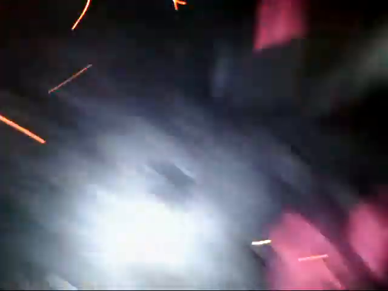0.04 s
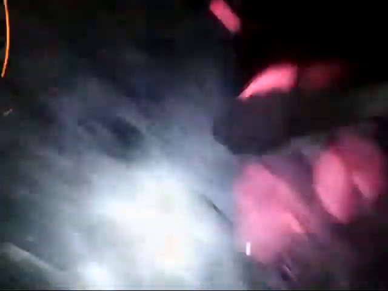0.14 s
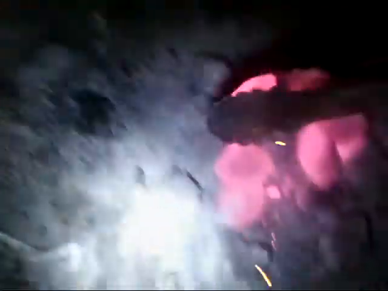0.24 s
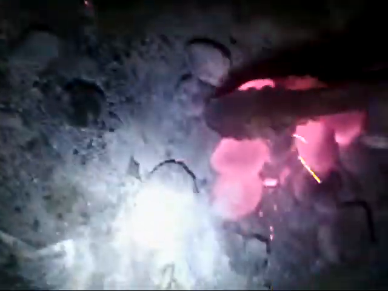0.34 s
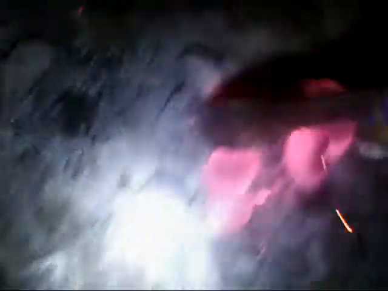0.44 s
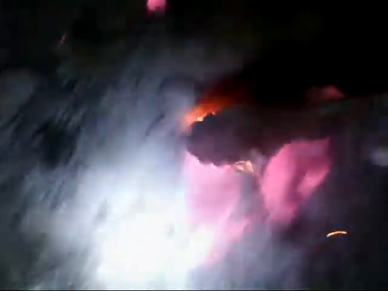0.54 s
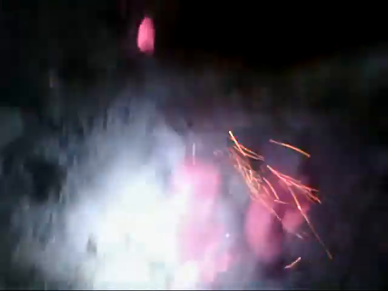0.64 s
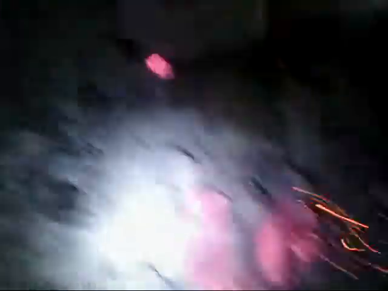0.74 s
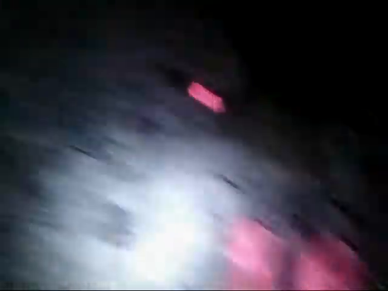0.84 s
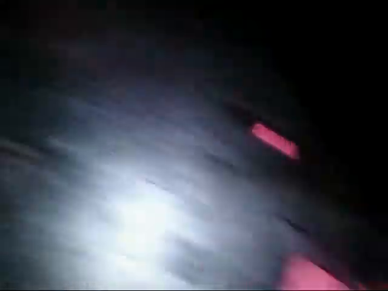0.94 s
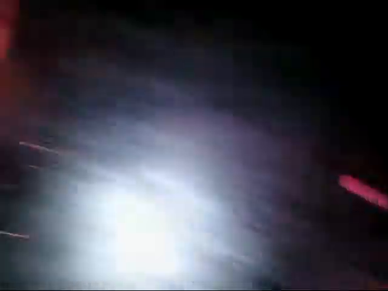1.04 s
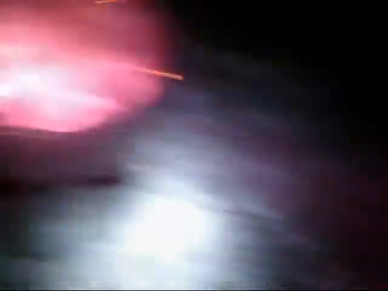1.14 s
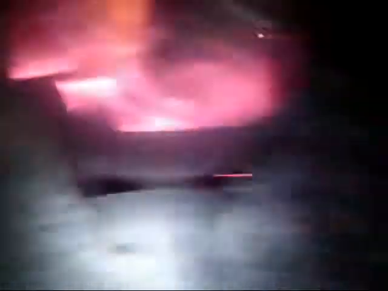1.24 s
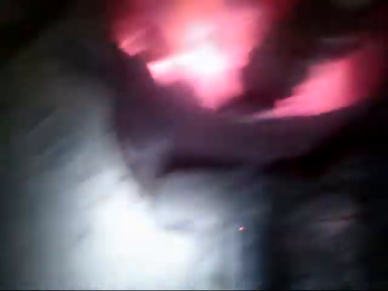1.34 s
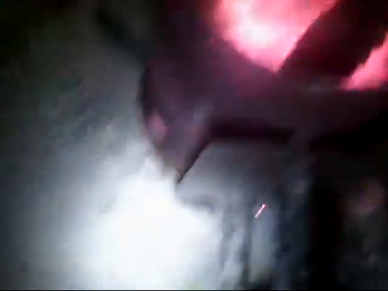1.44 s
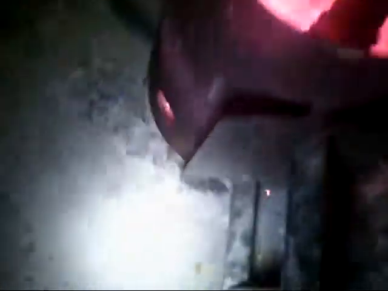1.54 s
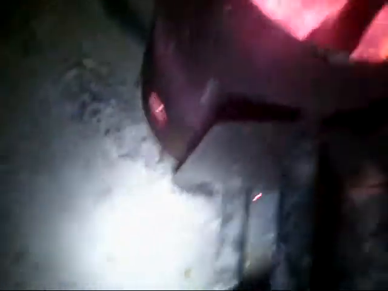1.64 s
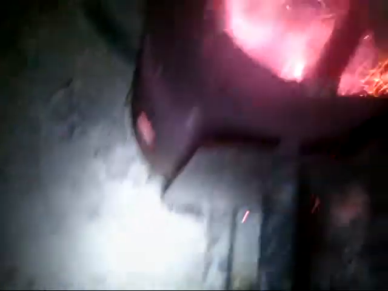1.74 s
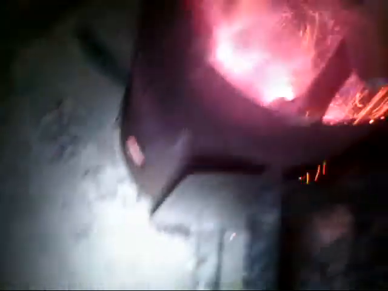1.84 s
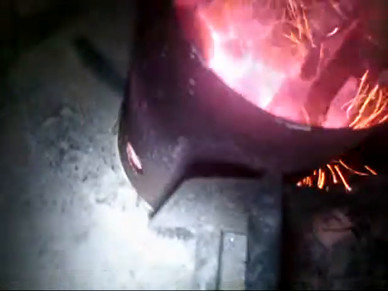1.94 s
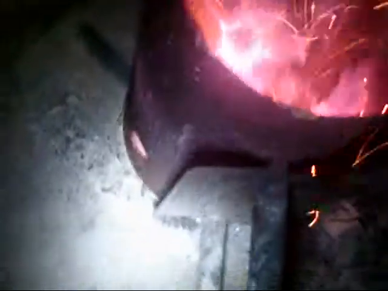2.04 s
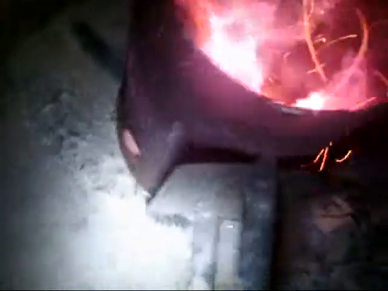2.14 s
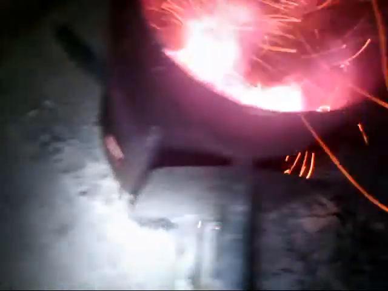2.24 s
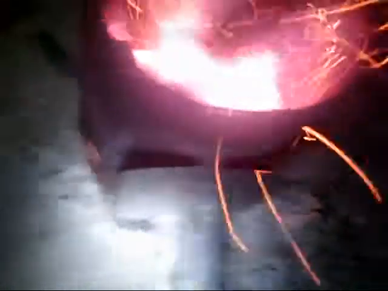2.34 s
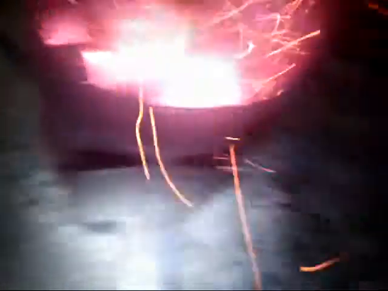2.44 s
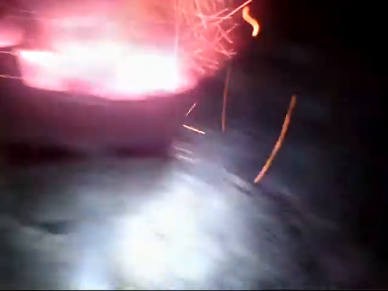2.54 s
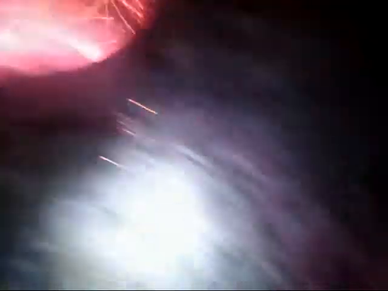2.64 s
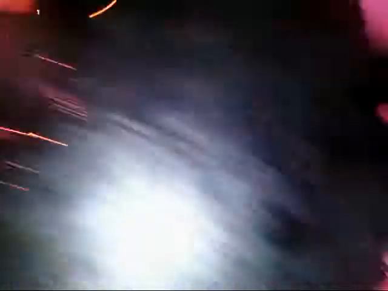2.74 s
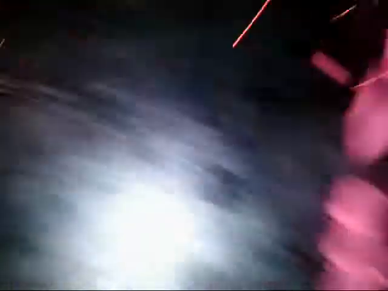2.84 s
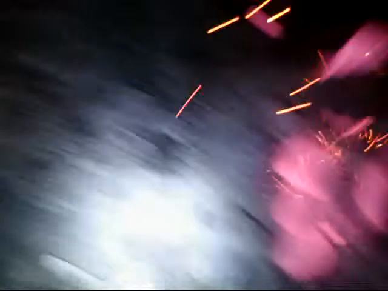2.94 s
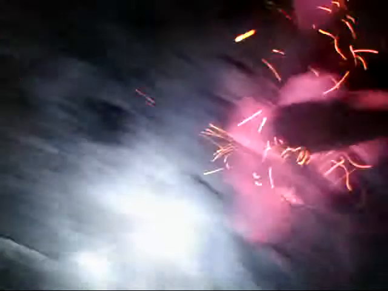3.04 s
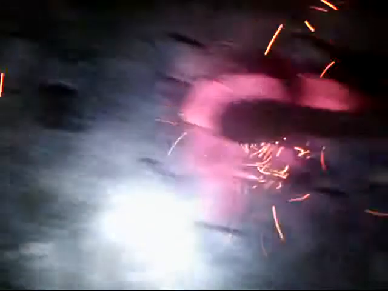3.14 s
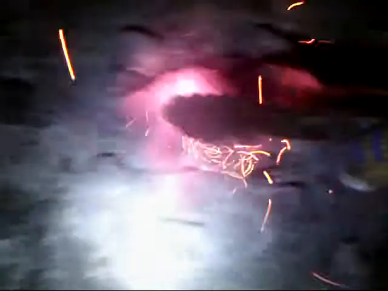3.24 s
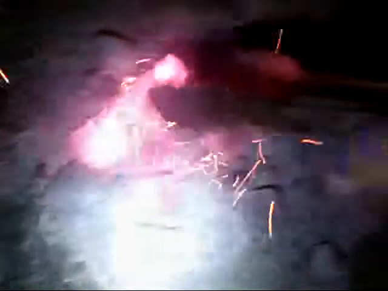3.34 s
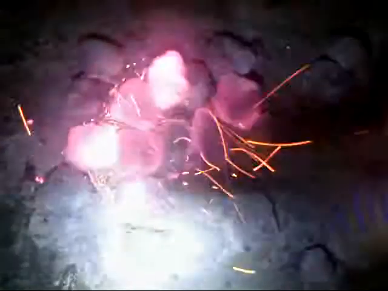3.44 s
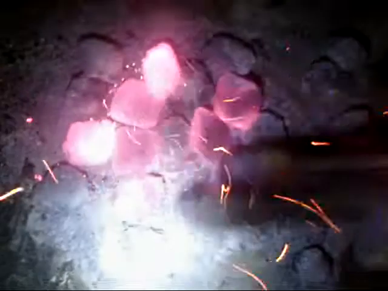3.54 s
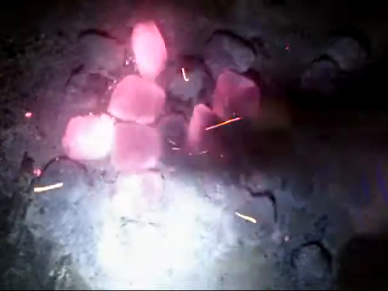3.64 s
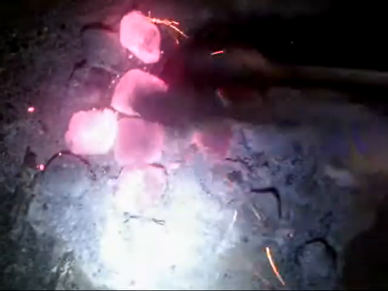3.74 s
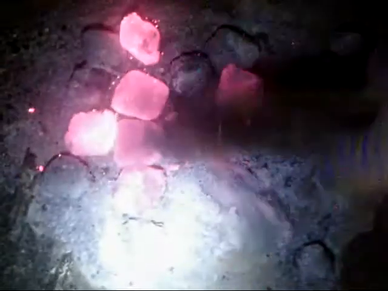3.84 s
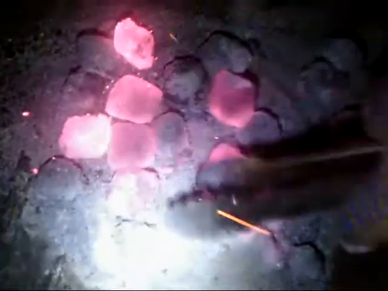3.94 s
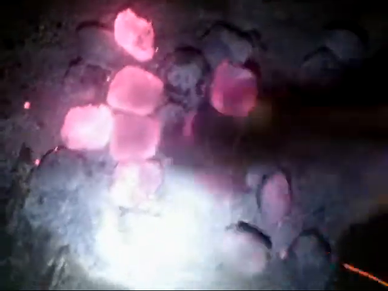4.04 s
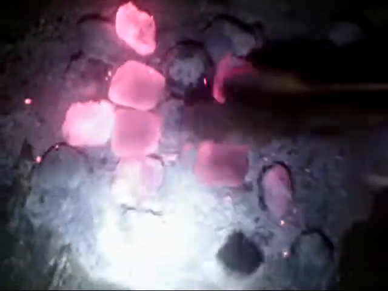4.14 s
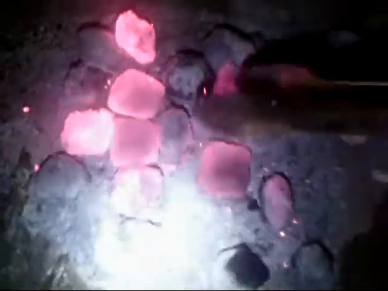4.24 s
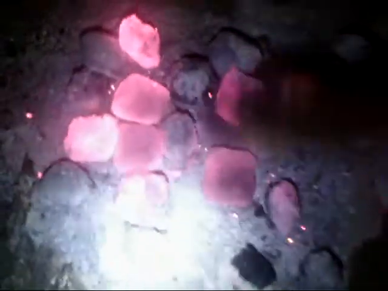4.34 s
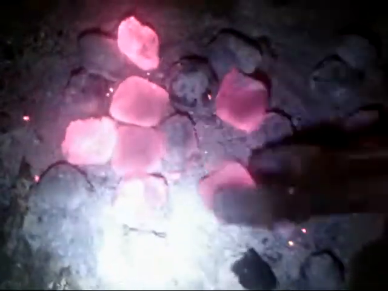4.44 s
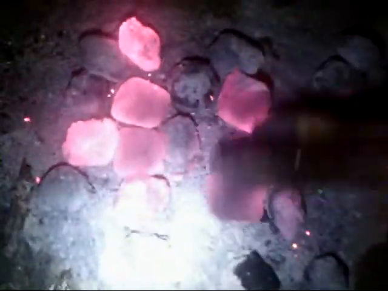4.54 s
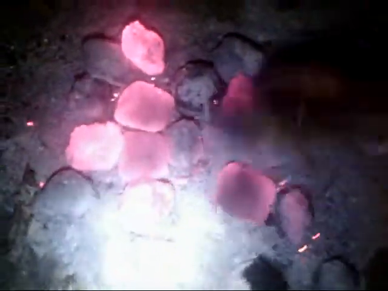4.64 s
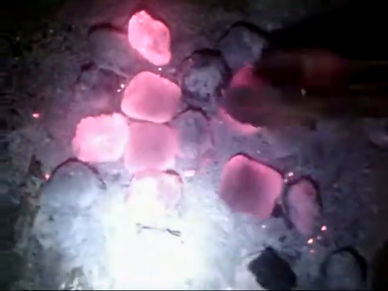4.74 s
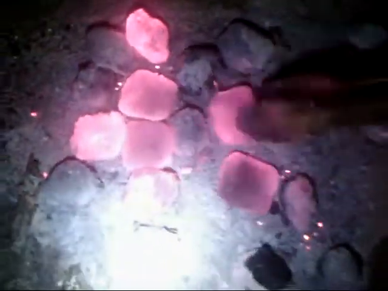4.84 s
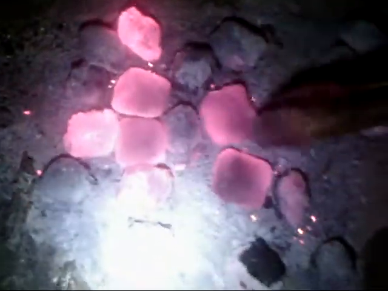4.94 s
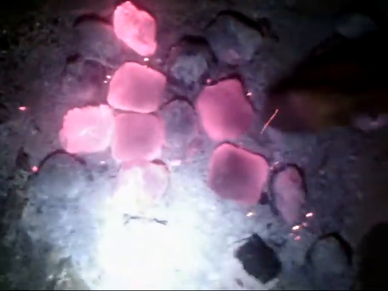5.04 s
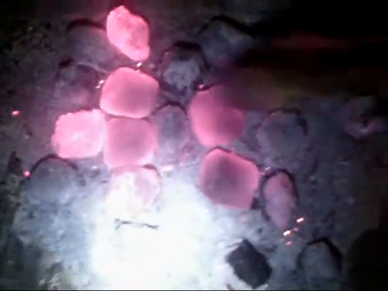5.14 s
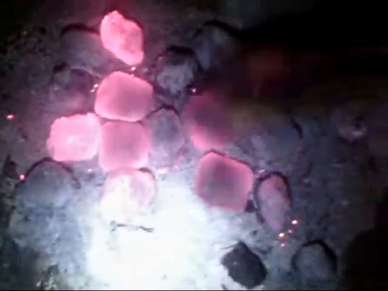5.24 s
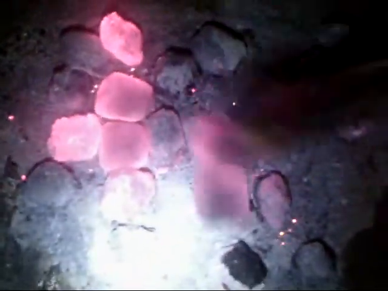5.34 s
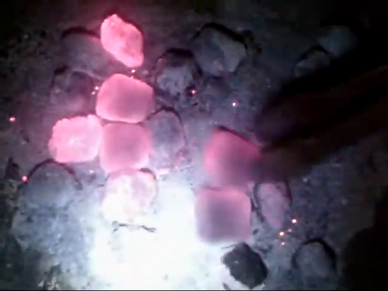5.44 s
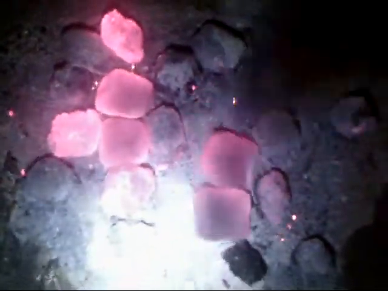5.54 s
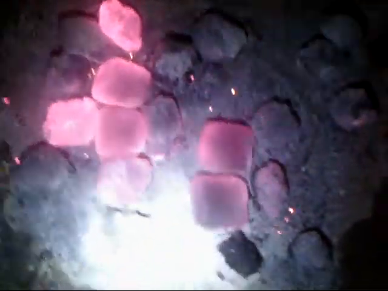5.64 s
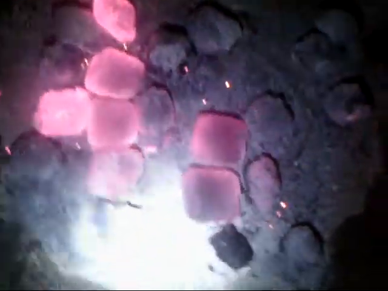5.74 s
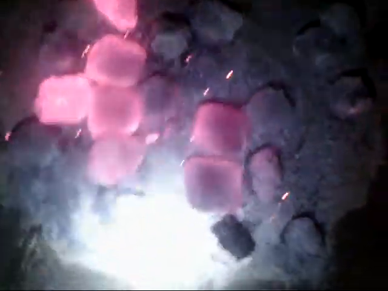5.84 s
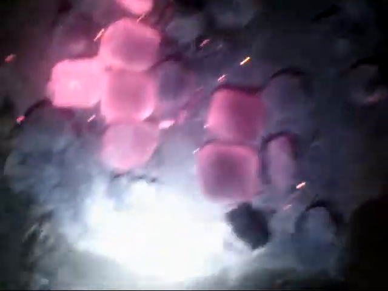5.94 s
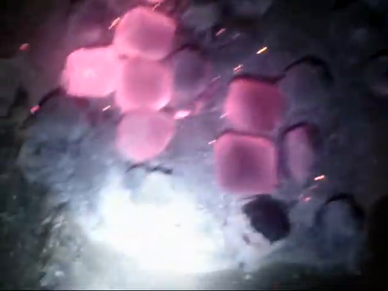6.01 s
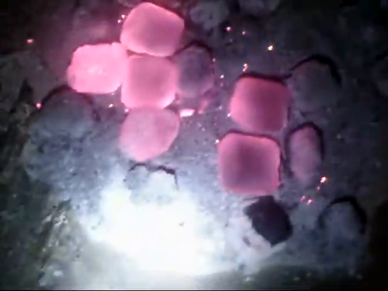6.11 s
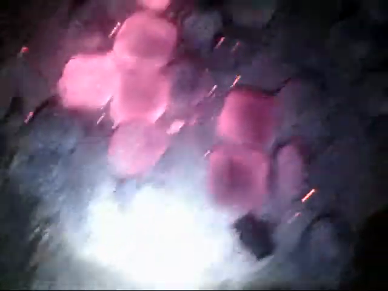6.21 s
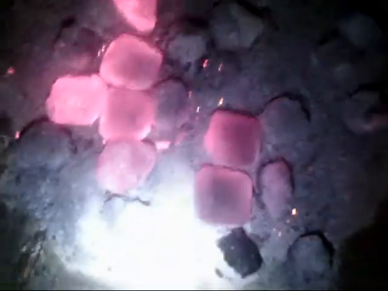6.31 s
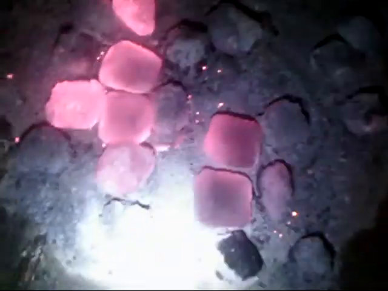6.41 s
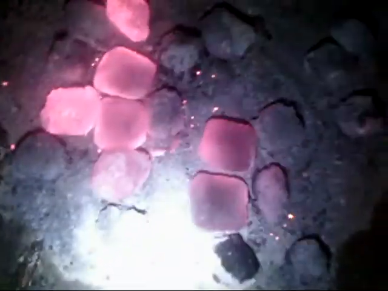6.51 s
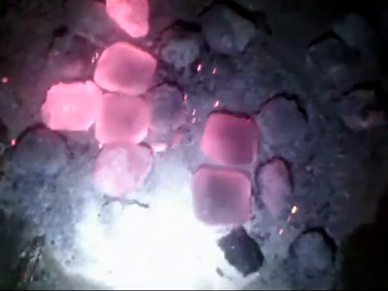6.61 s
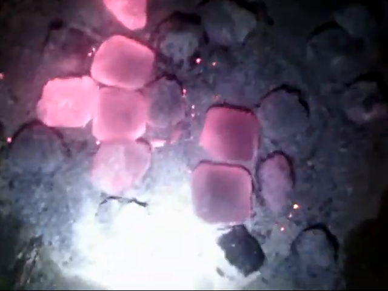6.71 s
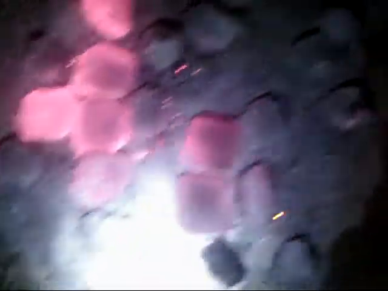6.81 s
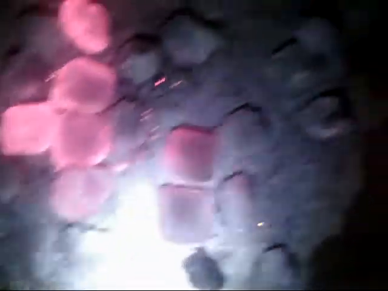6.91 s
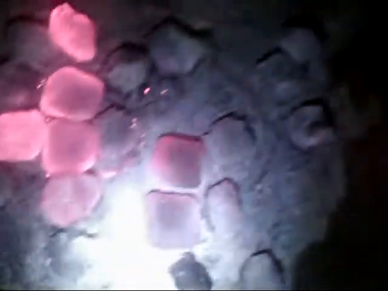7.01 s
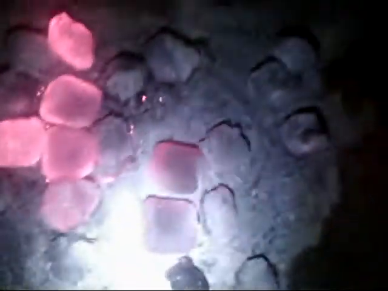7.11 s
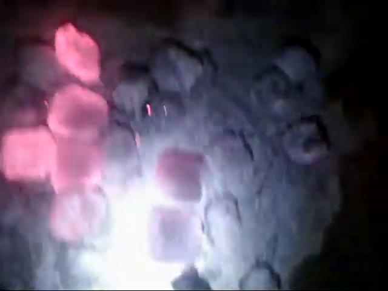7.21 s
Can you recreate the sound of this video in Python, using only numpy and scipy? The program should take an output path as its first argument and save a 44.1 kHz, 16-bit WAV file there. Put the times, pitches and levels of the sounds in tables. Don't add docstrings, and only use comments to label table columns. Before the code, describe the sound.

Brittle charcoal briquettes knock, crunch and scrape over ashy ground, tongs ticking faintly, with low wind buffets and a faint pulsing electronic whistle behind.

```python
import sys
import numpy as np
from scipy import signal
from scipy.fft import rfft, irfft, next_fast_len
from scipy.io import wavfile
from scipy.ndimage import uniform_filter1d

SR = 44100
rng = np.random.default_rng(int(sys.argv[2]) if len(sys.argv) > 2 else 0)


def nominal_scale(level):
    x = np.asarray(level, float) / 20
    return 10 ** x


def bounce(signal):
    frames = np.transpose(np.atleast_2d(signal))
    limited = np.clip(frames, -1, 1)
    pcm = np.round(limited * 32767).astype(np.int16)
    wavfile.write(sys.argv[1], SR, pcm)


N = 320594

# pitch_hz, level_db, t60_s
GROUND_MODES = [(79, -11.5, 0.08), (125.8, -5, 0.14), (190.5, -8.5, 0.096), (209.7, -2.5, 0.064),
                (273, -11, 0.05), (331, -9.5, 0.056)]
BRIQUETTE_MODES = [(381, -7.5, 0.089), (516, 4, 0.022), (604, -0.5, 0.07), (669, 0, 0.044),
                   (780.5, -1.5, 0.041), (834, -19.5, 0.038), (905, -0.5, 0.017), (1054, -7, 0.12),
                   (1210, -17, 0.12)]
TONGS_MODES = [(1427, 2.5, 0.038), (1666, 4.5, 0.013), (2125, 6.5, 0.011), (2490, 6.5, 0.018),
               (2980, -15, 0.01), (3520, -13.5, 0.024), (4320, -7, 0.015)]
PORT_MODES = [(7130, 9, 0.002), (8250, 9.5, 0.0023), (10200, -3, 0.0027), (11700, -20, 0.0014),
              (13450, -3, 0.0028)]

# start_s, knock_peak_db, thud_re_knock_db, tongs_re_knock_db
CRACKS = [(0.081, -51, -7, -3), (0.509, -43.5, -2, -3), (0.651, -23.5, -7, -21), (0.666, -37, 2, -18),
          (1.51, -47, 19, -10), (1.639, -35, 7, -12), (1.692, -22.5, -19, -38), (1.714, -35, -9, -18),
          (1.809, -42, -5, -17), (1.858, -34, -2, -24), (2.065, -43, -10, -2), (3.009, -8, -1, -26.5),
          (3.202, -31.5, 3, -16), (3.279, -34.5, 5, -16), (3.315, -38.5, -8, -3), (3.36, -22, 5, -33),
          (3.529, -32, -20, -13), (3.545, -41, 19.5, -2), (3.603, -22.5, -9, -7.5), (3.623, -57, 5, -4),
          (3.947, -19, -9.5, -19.5), (4.018, -52, -4, -3), (4.885, -35, 7, -5), (4.989, -45.5, -12, -2),
          (5.022, -31.5, -26, -20), (5.383, -41, 22, -8), (6.868, -21, -3, -16.5), (6.886, -35, 3, -6),
          (6.913, -29, -5, -15)]
# start_s, knock_peak_db, thud_re_knock_db, tongs_re_knock_db
PINCHES = [(0.591, -37, 6, -17), (1.966, -46, 4, -21), (2.077, -27.5, -9, 0.5), (2.215, -42, -8, -9),
           (2.647, -36, -15, -2.5), (2.871, -40, -4, -11), (3.034, -19, 2, -21), (4.843, -36, -4, -9),
           (5.408, -39, -8, -1), (5.436, -35, -8, -9), (5.467, -25, -5, -12), (6.058, -39, 5, -10),
           (6.087, -47, -14, -6), (6.139, -51, -15, -6), (6.173, -39, 5, -4), (6.892, -29, -7, -8)]
# start_s, knock_peak_db, thud_re_knock_db, tongs_re_knock_db
SETTLES = [
    (0.526, -30, 5.5, -22),
    (0.535, -38, -3, -5),
    (1.484, -22.5, -13, -26),
    (1.586, -32.5, -5, -16),
    (3.437, -41, 8, -16),
    (4.424, -34.5, -2, -10.5),
    (4.52, -27, -5, -12),
    (6.975, -40, 6, -9),
    (7.034, -33.5, 8.5, -14),
]
# start_s, length_s, knock_db, thud_re_knock_db, tongs_re_knock_db
SCRAPES = [(1.482, 0.057, -44, 6.5, 4.5), (1.59, 0.074, -38.5, 0.5, -2.5), (1.679, 0.057, -33, -3, -7),
           (1.774, 0.085, -36, -1, -6), (1.89, 0.17, -44, 4.5, -7), (2.045, 0.082, -45, 8.5, -3),
           (3.116, 0.175, -47, 15.5, -4), (3.402, 0.21, -52, 13.5, -3), (3.665, 0.1, -57.5, 17, 4),
           (4.852, 0.08, -33.5, 4, -7.5), (5.384, 0.1, -31, 6, -8.5), (6.033, .06, -44, 4, -5),
           (6.1, 0.037, -47, -2, -0.5), (7.1, .15, -48, -4, -3), (6.87, 0.035, -37.5, 8, -5.5)]
# start_s, fall_20_db_s, knock_db, thud_re_knock_db, tongs_re_knock_db
ROLLS = [
    (3.027, 0.1, -27.5, 0, -17),
    (3.358, 0.1, -37, -8, -22),
    (3.625, .07, -42, 8, -20),
    (3.95, 0.2049, -34, 0, -5),
    (4.428, .06, -37, 3, -23),
    (4.534, .12, -44.5, 9, -4),
]

# start_s, peak_db, knock_hz, thud_hz, thud_re_knock_db
KNOCKS = [(0.528, -31, 550, 140, -16), (0.65, -26, 536, 131, -3.5), (0.667, -33.5, 584, 218, 4),
          (1.486, -34, 525, 136, -26), (1.697, -24.5, 755, 322, -5.5), (1.714, -30.5, 760, 256, 1.5),
          (1.972, -41.5, 800, 192, 10.5), (3.011, -13, 924, 125, -8.5), (3.027, -20, 954, 216, -0.5),
          (3.038, -35, 680, 126, -24), (3.362, -20.5, 767, 123, -14), (3.379, -34.5, 756, 234, 3.5),
          (3.438, -39.5, 571, 200, 7), (3.605, -31.5, 686, 111, -2), (3.949, -35.5, 620, 307, 1),
          (4.434, -28.5, 587, 296, -5), (4.524, -34.5, 498, 111, 1), (4.889, -24, 683, 184, -10.5),
          (5.387, -32, 673, 124, -3), (6.892, -31.5, 580, 276, 2)]
# start_s, peak_db, pitch_hz
TICKS = [(0.5, -42, 1700), (0.5153, -44, 2480), (0.5357, -42, 1500), (2.0784, -45, 1660),
         (2.6497, -35, 1790), (3.0158, -33.5, 2420), (6.0575, -44, 2490), (6.095, -46, 1600),
         (6.112, -38, 1630), (6.1386, -46, 2580), (6.1774, -47, 1630), (6.871, -29.5, 2490),
         (3.972, -36, 2610)]
# start_s, peak_db, pitch_hz
CLINKS = [(0.5352, -38, 4250), (1.5144, -41, 4270), (2.0787, -37, 4250), (3.0121, -48, 3720),
          (6.0566, -41, 4230), (6.0896, -43, 4270), (6.1394, -33.5, 4250), (6.871, -37, 5520),
          (6.871, -35, 4340), (3.013, -38, 6050), (6.8874, -39, 4330)]

# middle_s, half_length_s, level_db
SIFTS = [
    (0.54, 0.01, -52),
    (1.535, .025, -49),
    (1.6, 0.014, -51),
    (1.652, .012, -49),
    (1.825, .03, -56),
    (2.083, 0.012, -45),
    (3.203, .008, -53),
    (4.923, 0.023, -49),
    (5.48, 0.023, -53),
    (6.12, 0.052, -55),
]
# pitch_hz, level_db, t60_s
SIFT_RINGS = [(8500, -3.5, .006), (13650, -7, .005)]

# time_s, level_db
GUST = [(0.0, -31.5), (0.34, -42), (0.85, -40), (1.07, -29), (1.54, -41.5), (2.33, -43), (2.55, -37.5),
        (2.71, -45), (3.16, -41.5), (3.99, -43), (4.29, -42), (4.49, -61), (4.59, -49.5), (5.3, -38),
        (5.55, -50), (6.3, -46), (6.62, -42), (7.27, -57)]
# middle_s, level_db
PUFFS = [
    (0.028, -26),
    (0.11, -31),
    (1.039, -23),
    (1.17, -44),
]
# frequency_hz, density_db_per_hz
WIND_SPECTRUM = [(8, 12), (17, 5.5), (24, -9), (33, -3), (45, -10), (62, 1.5), (80, -17), (100, -12),
                 (140, -76.5)]
SWAY_SPECTRUM = [(1, -14.5), (10, 4), (18, -29), (26, -21), (36, -8.5), (48, -29), (70, -60)]
NIGHT_SPECTRUM = [(53, -25), (90, -3), (172, -10.5), (500, -16), (1000, -17), (3220, -26), (8500, -29),
                  (16000, -37)]
# pitch_hz, width_hz, level_db
DRONES = [(1171, 15, -64.5)]
# multiple_of_firing_rate, level_db
ENGINE_ORDERS = [(1, -50), (2, -54), (3, -58), (4, -54.5), (5, -55.5), (7, -68), (8, -68)]
# pitch_hz, level_db
WHINES = [(5599, -76), (7014, -79), (7402, -79), (8086, -81), (9598, -82), (12452, -85), (14648, -89),
          (15036, -90)]

# grit_re_tongs_db, crumble_t60_s
CRACK, PINCH, SETTLE = (1.5, 0.058), (-8.5, 0.085), (-5.5, 0.16)
SETTLE_S = 0.003
SWELL_DB, STOP_S = 6.0, 0.062
THUD_LINGER = 1.5
DRAG_GRIT_DB, GRIP_S = -12.5, 0.0067
KNOCK_T60_S, TICK_T60_S, CLINK_T60_S = 0.056, 0.05, 0.019
PUFF_S, PUFF_HZ = 0.031, 6.2
SWAY_DB, NIGHT_DB = -38, -49
ENGINE_HZ, ENGINE_WAVER_HZ = 33.3, 0.12
WHISTLE_HZ, WHISTLE_DB = 2579.5, -58.5
PULSES_PER_S, PULSE_START, DUTY = 19.886, -0.13, 0.63
CUTOFF_HZ, OFFSET = 15650, -0.016


def contacts():
    bumps = drift(42)
    thud = body(GROUND_MODES, pressure(bumps, layer=0, blow_db=-11.0), (80, 350),
                per_s=460, spread_db=0.1, uneven_db=5.0, touch=14.4, dry_db=-8)
    knock = body(BRIQUETTE_MODES, pressure(bumps, layer=1, blow_db=-14.5), (300, 1400),
                 per_s=820, spread_db=2.5, uneven_db=0.94, touch=15.0, dry_db=-5.5)
    tongs = body(TONGS_MODES, pressure(bumps, layer=2, blow_db=-7), (1100, 5000),
                 per_s=1500, spread_db=-1.5, uneven_db=1.5, touch=11.0, dry_db=-7.0)
    grit = body(PORT_MODES, pressure(bumps, layer=3, blow_db=-6), (4500, 15500),
                per_s=8000, spread_db=7.0, uneven_db=1.0, touch=1.5, dry_db=-2)
    soft_thud = signal.sosfilt(signal.butter(2, 420, fs=SR, output="sos"), thud)
    soft_knock = signal.sosfilt(signal.butter(4, 1350, fs=SR, output="sos"), knock)
    return soft_thud + soft_knock + tongs + grit


def body(modes, push, band_hz, per_s, spread_db, uneven_db, touch, dry_db):
    force = grains(per_s, spread_db)
    force[[round((row[0] + SETTLE_S) * SR) for row in touches()]] = touch
    rung = np.zeros(N)
    steady_power = 0
    for k, (hz, db, t60) in enumerate(modes):
        steady_power += nominal_scale(2 * db) * t60 * SR / np.log(1e12)
        strike = force * push * nominal_scale(uneven_db * drift(8.6))
        rung += nominal_scale(db) * (-1) ** k * ring(strike, hz, t60)
    band = signal.butter(2, band_hz, "band", fs=SR, output="sos")
    direct = signal.sosfilt(band, force * push + 1e-18)
    direct /= np.sqrt(2 * (band_hz[1] - band_hz[0]) / SR)
    return rung / np.sqrt(steady_power) + nominal_scale(dry_db) * direct


def pressure(bumps, layer, blow_db):
    push = np.zeros(N)
    for s, knock_db, *rel_db, t60 in touches():
        at, t60 = round(s * SR), max(t60, 0.005)
        after = np.arange(min(round(t60 * SR), N - at)) / SR
        level_db = knock_db + (rel_db[0], 0, rel_db[1], rel_db[2])[layer] + blow_db
        build_up = np.minimum(after / SETTLE_S, 1)
        push[at:at + len(after)] += nominal_scale(level_db + 2 - 60 * after / t60) * build_up

    stop = 2 * STOP_S * (THUD_LINGER if layer == 0 else 1)
    drags = [(row, [0, row[1], row[1] + stop], [-SWELL_DB, 0, -40]) for row in SCRAPES]
    drags += [(row, [0, 2 * row[1]], [0, -40]) for row in ROLLS]
    for (s, _, knock_db, thud_db, tongs_db), times, shape_db in drags:
        at = round(s * SR)
        t = np.arange(min(round(times[-1] * SR), N - at)) / SR
        span = slice(at, at + len(t))
        level_db = knock_db + (thud_db, 0, tongs_db, tongs_db + DRAG_GRIT_DB)[layer]
        level_db = level_db + np.interp(t, times, shape_db)
        push[span] += nominal_scale(level_db - 6.0 + 2.2 * bumps[span]) * np.minimum(t / GRIP_S, 1)
    return push


def touches():
    kinds = (CRACKS, CRACK), (PINCHES, PINCH), (SETTLES, SETTLE)
    return [(*row, row[-1] + grit_db, t60) for rows, (grit_db, t60) in kinds for row in rows]


def grains(per_s, spread_db):
    size = nominal_scale(spread_db * np.minimum(rng.exponential(1, N), 4)) * rng.choice([-1, 1], N)
    return rms_one(size * (rng.random(N) < per_s / SR))


def knocks():
    out = np.zeros(N)
    for rows, t60 in (TICKS, TICK_T60_S), (CLINKS, CLINK_T60_S):
        for s, db, hz in rows:
            add_mode(out, s, db - 1.0, hz, t60, rise=0.0004)
    for s, db, hz, thud_hz, thud_db in KNOCKS:
        add_mode(out, s, db - 2.0, hz, KNOCK_T60_S, rise=0.00078)
        add_mode(out, s, db - 19.5, 1.1 * hz, KNOCK_T60_S, rise=0.00087)
        add_mode(out, s, db + thud_db + 3.5, thud_hz, 1.73 * KNOCK_T60_S, rise=0.0004)
    return out


def add_mode(out, s, db, hz, t60, rise):
    at = round(s * SR)
    t = np.arange(min(round(max(t60, 0.005) * SR), N - at)) / SR
    envelope = nominal_scale(db - 60 * t / t60) * (1 - np.exp(-t / rise))
    out[at:at + len(t)] -= envelope * np.sin(2 * np.pi * hz * t)


def sifting():
    t = np.arange(N) / SR
    flow = sum(nominal_scale(db) * np.exp(-((t - s) / half) ** 2) for s, half, db in SIFTS)
    ash = grains(per_s=5000, spread_db=2.5)
    flicker = nominal_scale(2.5 * drift(60))
    return flow * flicker * sum(nominal_scale(db) * rms_one(ring(ash, hz, t60)) for hz, db, t60 in SIFT_RINGS)


def wind():
    gust_s, gust_db = np.transpose(GUST)
    t = np.arange(N) / SR
    puffs = [(s, nominal_scale(db) * np.exp(-((t - s) / PUFF_S) ** 2)) for s, db in PUFFS]
    flow = nominal_scale(np.interp(t, gust_s, gust_db) + 1.2 * drift(8.6))
    flow = flow + nominal_scale(-17) * sum(push for s, push in puffs)
    rocking = nominal_scale(11) * sum(push * np.sin(2 * np.pi * PUFF_HZ * (s - t)) for s, push in puffs)
    return nominal_scale(3.5) * flow * coloured(WIND_SPECTRUM) + nominal_scale(SWAY_DB) * coloured(SWAY_SPECTRUM) + rocking


def night():
    drones = sum(nominal_scale(db) * rms_one(ring(rng.standard_normal(N), hz, 1.5 / width)) for hz, width, db in DRONES)
    return nominal_scale(NIGHT_DB + 0.5 * drift(0.33)) * coloured(NIGHT_SPECTRUM) + drones


def engine():
    turns = np.cumsum(ENGINE_HZ + ENGINE_WAVER_HZ * drift(1)) / SR
    hum = np.zeros(N)
    for order, db in ENGINE_ORDERS:
        level = np.sqrt(2) * nominal_scale(db + 1.86 * drift(4.1))
        hum += level * np.sin(2 * np.pi * (order * turns + rng.random()))
    return hum


def electronics():
    t = np.arange(N) / SR
    whines = sum(np.sqrt(2) * nominal_scale(db) * np.sin(2 * np.pi * (hz * t + rng.random()))
                 for hz, db in [*WHINES, (4801, -79)])
    gate = uniform_filter1d(((PULSES_PER_S * t + PULSE_START) % 1 < DUTY) * 1., size=90)
    return whines + np.sqrt(2) * nominal_scale(WHISTLE_DB) * gate * np.sin(2 * np.pi * WHISTLE_HZ * t)


def ring(force, hz, t60):
    r, w = nominal_scale(-60 / (t60 * SR)), 2 * np.pi * hz / SR
    return signal.lfilter([0, np.sin(w)], [1, -2 * r * np.cos(w), r * r], force + 1e-18)


def coloured(spectrum):
    size = next_fast_len(N)
    hz, db = np.transpose(spectrum)
    bin_hz = np.arange(size // 2 + 1) * SR / size
    shape_db = np.interp(np.log(bin_hz + 1e-3), np.log(hz), db)
    return rms_one(irfft(rfft(rng.standard_normal(size)) * nominal_scale(shape_db), size)[:N])


def drift(rate):
    r = np.exp(-80 * np.pi * rate / SR)
    slow = signal.lfilter([1], [1, -2 * r, r * r], rng.standard_normal(N // 40 + 2002))[2000:]
    return np.interp(np.arange(N) / 40, np.arange(len(slow)), rms_one(slow))


def rms_one(x):
    return x / np.sqrt(np.mean(x ** 2) + 1e-20)


def scene():
    return (contacts() + knocks() + sifting() + wind() + night() + engine() + electronics())[None]


def roll_off(x):
    return signal.sosfilt(signal.butter(12, 16460, fs=SR, output="sos"), x)


def record(dry):
    b, a = signal.iirpeak(11000, 5.0, fs=SR)
    dipped = dry - 0.22 * signal.lfilter(b, a, dry)
    rolled_off = signal.lfilter([0.82, 0.18], [1], dipped)
    cut = signal.sosfilt(signal.ellip(10, 0.5, 60, CUTOFF_HZ, fs=SR, output="sos"), rolled_off)
    return roll_off(cut + OFFSET)


dry = scene()
out = record(dry)
bounce(out)
```